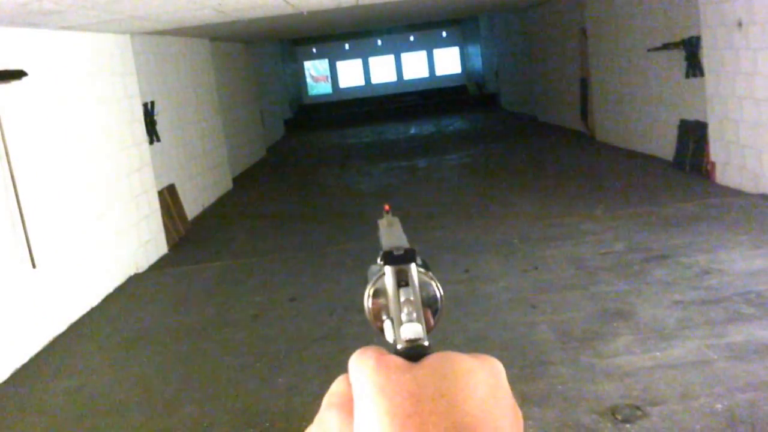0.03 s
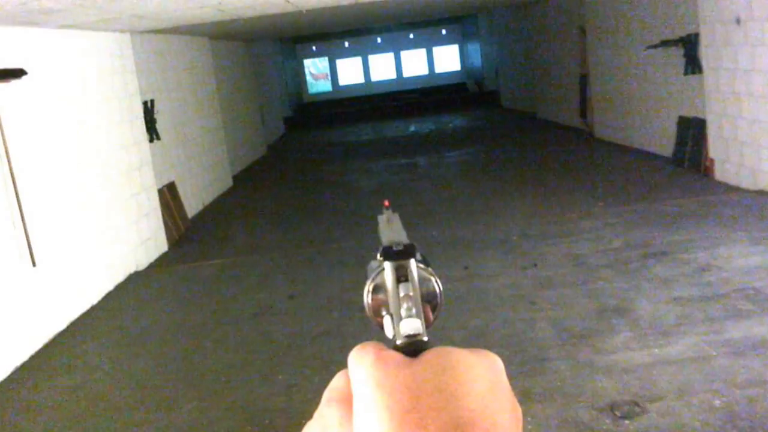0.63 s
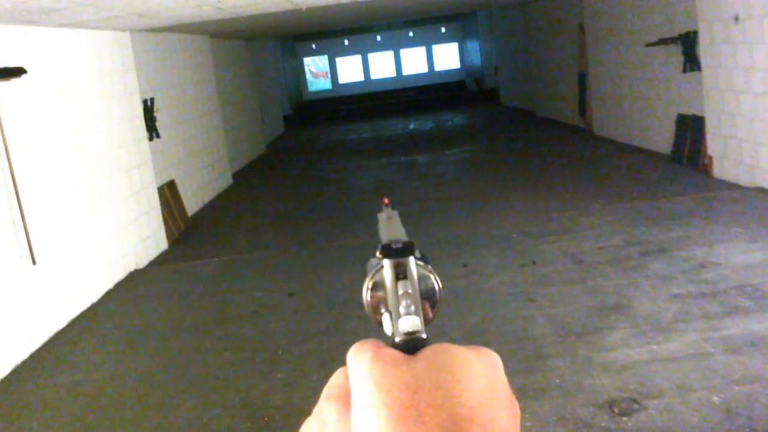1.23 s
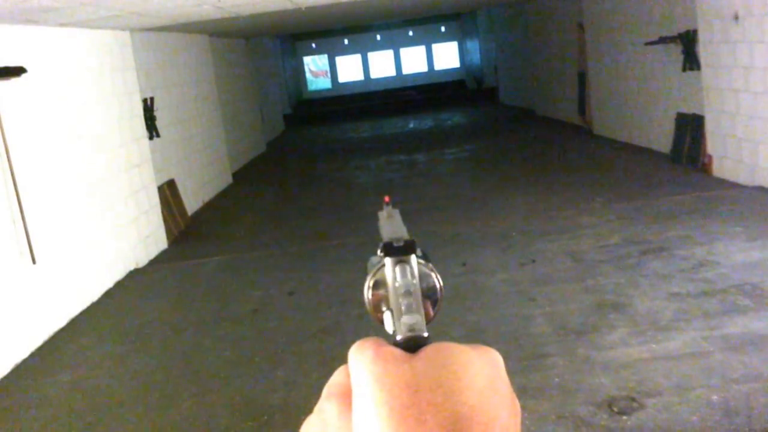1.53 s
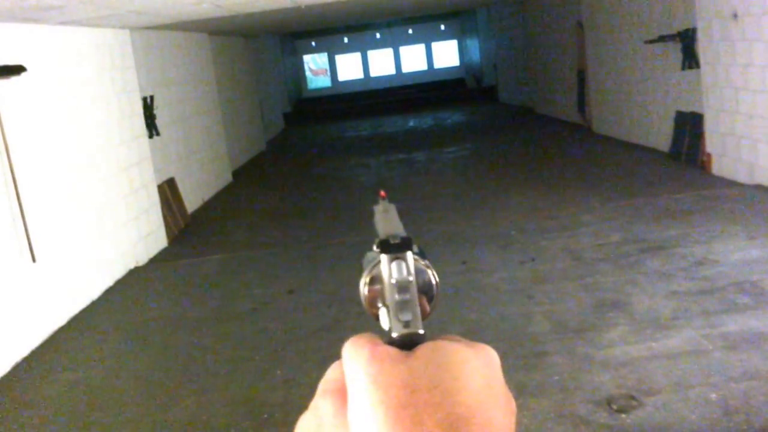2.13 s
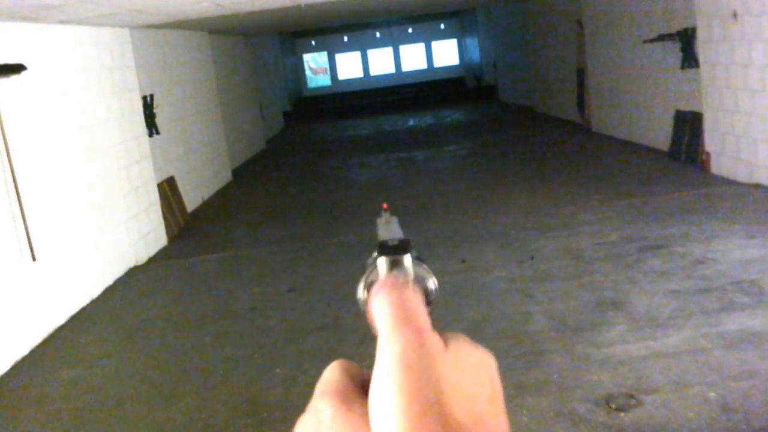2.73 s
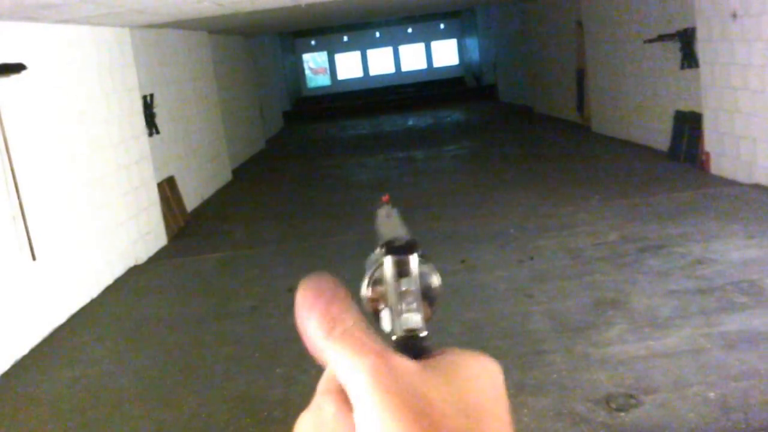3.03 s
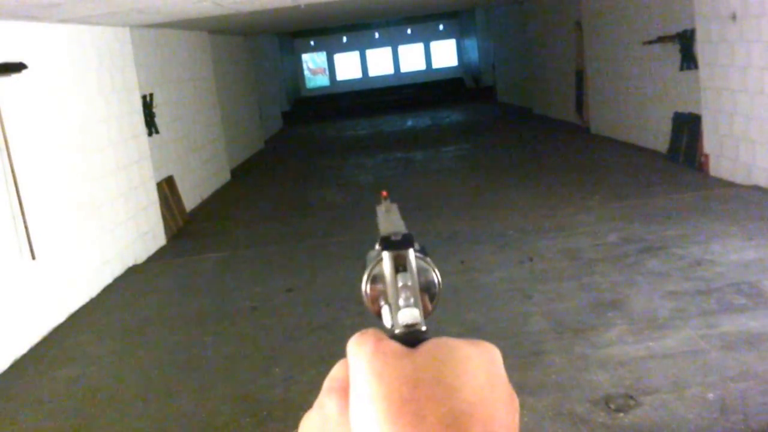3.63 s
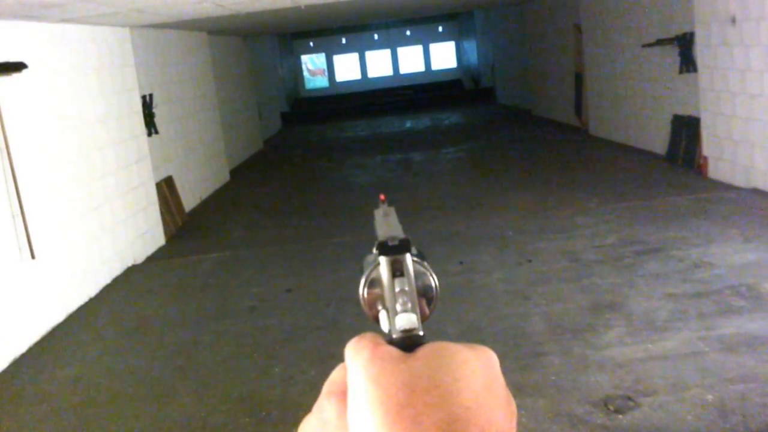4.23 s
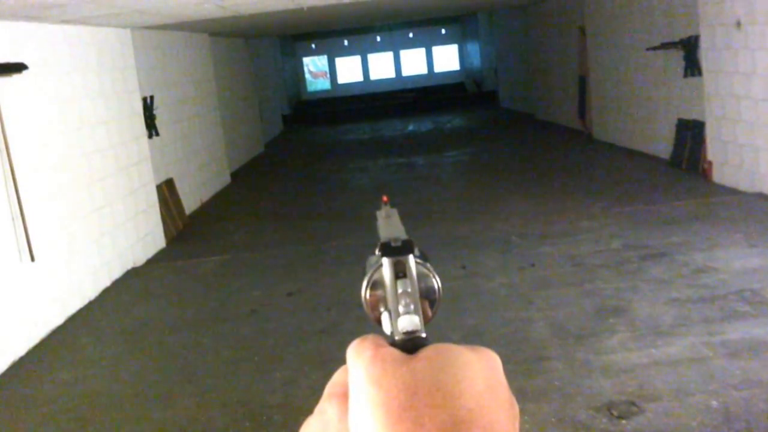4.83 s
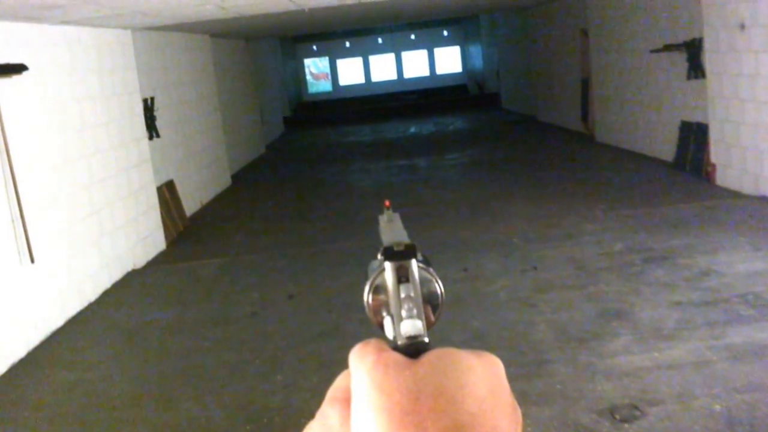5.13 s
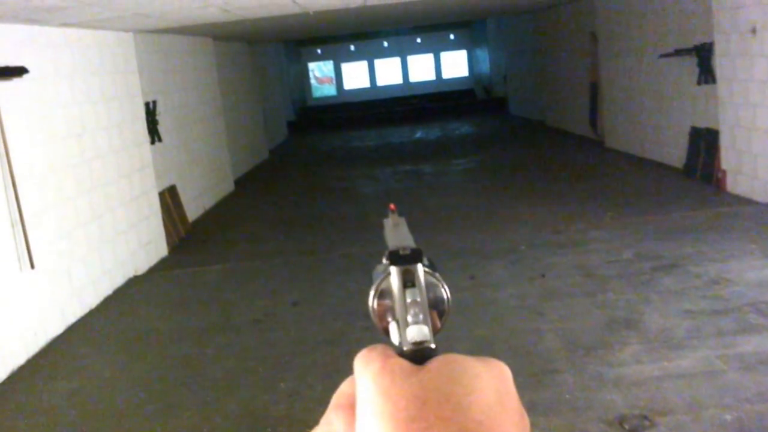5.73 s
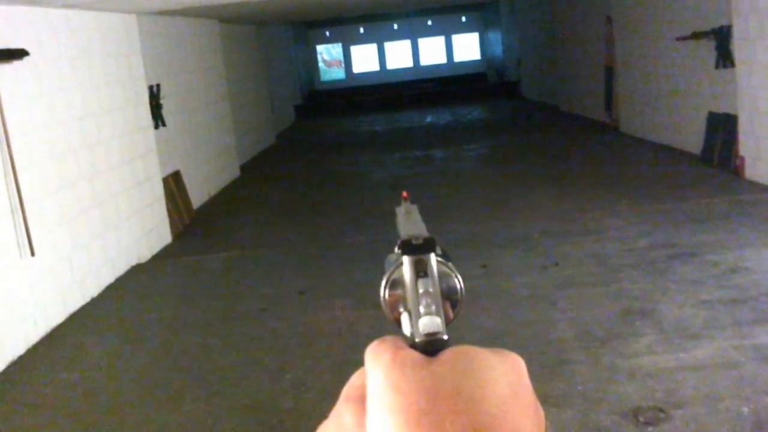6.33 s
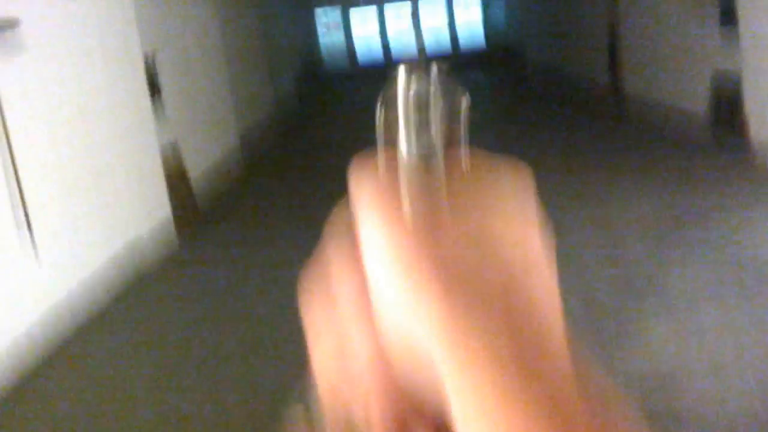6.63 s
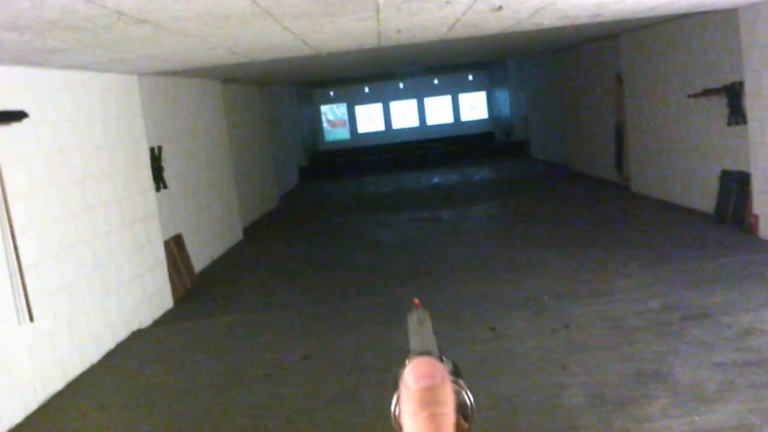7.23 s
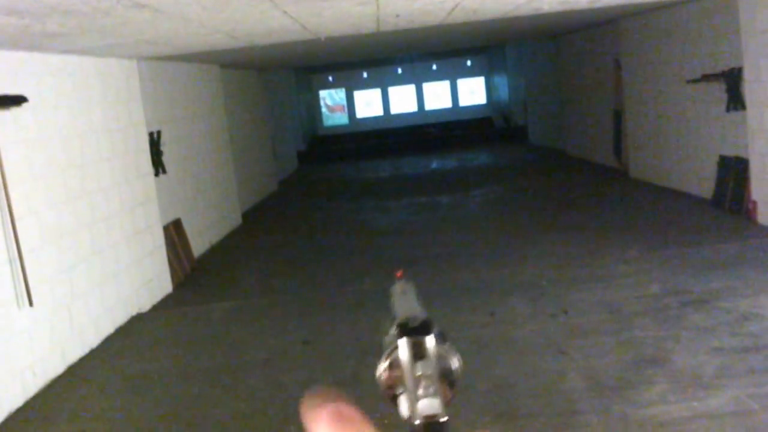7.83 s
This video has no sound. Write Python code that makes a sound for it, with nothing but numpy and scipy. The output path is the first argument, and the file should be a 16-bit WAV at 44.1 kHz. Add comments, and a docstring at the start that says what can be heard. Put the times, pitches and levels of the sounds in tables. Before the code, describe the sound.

In an indoor shooting range, faint hiss and low ventilation run steadily. A revolver's hammer falls on an empty chamber with a small steel click, and a few very faint ticks follow as it is cocked again. After a pause it fires once, right in front of the microphone, overloading it. The blast slaps off concrete walls, bounces back from the far end and rings out over a soft rumble.

```python
"""A long concrete shooting range, heard through a small camera: ventilation, hiss, low flutter, handling.
At 1.5 s a revolver's hammer drops on an empty chamber, ringing the steel frame; the lock ticks as it is
cocked again. At 6.3 s it fires just in front of the camera. The blast overloads the microphone and slaps
off the near walls, then comes back from the bullet trap as two bangs. The hall rings out over the soft
rumble of the recoil."""
import sys
import numpy as np
from scipy import signal
from scipy.fft import rfft, irfft
from scipy.io import wavfile

SR = 44100
rng = np.random.default_rng(int(sys.argv[2]) if len(sys.argv) > 2 else 0)


def store_pcm(level_fs):
    """Save levels as 16-bit WAV."""
    pcm = np.round(np.clip(level_fs, -1, 1) * 32767).astype(np.int16)
    wavfile.write(sys.argv[1], SR, np.atleast_2d(pcm).T)


N = 352800
SHOT_S = 6.3418
AGE = np.arange(2 * SR) / SR  # seconds since a hit

# Tone colour of the blast and its slaps: a deep notch near 1.4 kHz, peaks near 1.95, 2.9 and 4.4 kHz. Each row:
# frequency in Hz, relative level in dB.
SHOT_COLOUR = [(35, -21.5), (80, -15), (130, -5.5), (210, -3.5), (380, 2), (650, 3.5), (1150, -2),
               (1400, -21), (1950, 2), (2450, -3.5), (2900, 0), (3500, -13.5), (4400, -0.5), (5400, -19)]


def gunshot(blast_db=10, echo_db=8.5, loss_db=2.23, walls_m=(3.77, 2.78), wash_db=4, hall_db=-9):
    """The muzzle blast bounces from side wall to side wall, fills the hall and wakes its standing waves."""
    # Standing waves between walls, floor and ceiling.
    # Each row: frequency in Hz, level in dB, seconds to fall 60 dB.
    standing_waves = [(82.5, -41.5, 2.2), (129, -27, 1.15), (150, -36, 0.53), (184, -30, .9)]
    out = np.zeros(N)
    add(out, SHOT_S, undb(blast_db) * slap(length_s=.0006))
    add(out, SHOT_S + .0027, undb(13.5) * slap(length_s=.001))  # reflection off the shooter
    echo_s = SHOT_S
    for k in range(4):
        echo_s += 2 * walls_m[k % 2] / 343  # to a wall and back at the speed of sound
        add(out, echo_s, undb(echo_db - k * loss_db) * slap(length_s=.0006))
    add(out, SHOT_S, undb(wash_db) * noise(SHOT_COLOUR, len(AGE)) * fade(.23))
    add(out, SHOT_S, undb(hall_db) * hall_tail() * swell(.088))
    for hz, db, t60 in standing_waves:
        add(out, SHOT_S, ring(hz, db, t60))
    return out


def slap(length_s, scatter_db=-8, scatter_t60=.029):
    """An N-shaped pressure wave, trailed by the scatter off rough concrete."""
    n_wave = (1 - 2 * AGE / length_s) * (AGE < length_s)
    scatter = undb(scatter_db) * noise(SHOT_COLOUR, len(AGE)) * fade(scatter_t60)
    return band(n_wave, 260, 6000, order=1) + scatter


def hall_tail():
    """Dense echoes of the hall; each octave dies at its own rate."""
    # Tone colour of the hall. Each row: frequency in Hz, relative level in dB.
    hall_colour = [(35, -15.5), (130, -9), (230, -11), (420, -4.5), (650, 0), (1160, -1), (1380, -14.5),
                   (1750, -3), (2050, -3.5), (2650, -10.5), (2950, -2.5), (3600, -12.5), (4300, -4.5),
                   (5400, -18)]
    # Reverb time. Each row: frequency in Hz, seconds to fall 60 dB.
    hall_t60 = [(60, 2.1), (200, 1.34), (500, 1.54), (1100, 1.357), (3000, 1.43), (5000, 0.97)]
    spectrum = rfft(noise(hall_colour, len(AGE)))
    octaves_hz = 45 * 2. ** np.arange(8)
    log_hz = np.log(np.linspace(1, SR / 2, len(spectrum)))
    tail = np.zeros(len(AGE))
    for hz, solo in zip(octaves_hz, np.eye(len(octaves_hz))):
        crossover = np.interp(log_hz, np.log(octaves_hz), solo)
        tail += irfft(spectrum * crossover) * fade(lookup(hall_t60, hz))
    return tail


def bullet_trap(hall_db=-16):
    """The far end answers with two bangs; its steel plates ring faintly and the hall swells again."""
    # Bangs off the trap. Each row: start in seconds, level in dB, rise in seconds, seconds to fall 60 dB.
    bangs = [(6.487, -9, 0.003, .16), (6.508, -8, 0.002, 0.36)]
    # Tone colour of the bangs. Each row: frequency in Hz, relative level in dB.
    trap_colour = [(100, -23), (400, -3.5), (800, -5), (1150, 4.5), (1400, -13.5), (1750, -4), (2300, -5.5),
                   (2650, -10), (2950, 3.5), (3400, -10.5), (4500, -17.5), (5400, -22.5)]
    # Ring of the plates. Each row: frequency in Hz, level in dB, seconds to fall 60 dB.
    plate_modes = [(1040, -41, 2.1), (1110, -41.5, 2.5), (2970, -37, 1.5)]
    first_s, last_s = bangs[0][0], bangs[-1][0]
    out = np.zeros(N)
    for start_s, db, rise_s, t60 in bangs:
        add(out, start_s, undb(db) * noise(trap_colour, len(AGE)) * swell(rise_s) * fade(t60))
    add(out, last_s, undb(hall_db) * hall_tail() * swell(.03))
    for hz, db, t60 in plate_modes:
        add(out, first_s, ring(hz, db, t60))
    return out


def lockwork(hammer_s=1.516, hammer_db=-32, bounce_loss_db=7, room_db=-11):
    """The hammer falls on an empty chamber and bounces, the lock ticks; the near walls answer faintly."""
    # Ticks as the trigger is let go and the thumb cocks the hammer.
    # Each row: start in seconds, peak level in dB, band centre in Hz.
    lock_ticks = [(1.5765, -54, 4500), (2.046, -55, 3000), (2.669, -54, 2900), (2.733, -51, 1750),
                  (3.072, -57, 3500)]
    clicks = np.zeros(N)
    hit_s = hammer_s
    for k in range(3):
        add(clicks, hit_s, undb(hammer_db - k * bounce_loss_db) * steel_click())
        hit_s += .0071 * .45 ** k  # each bounce is shorter than the last
    for start_s, db, hz in lock_ticks:
        tick = band(steel_click(), hz / 1.35, hz * 1.35, order=1)
        add(clicks, start_s, undb(db) * tick / np.abs(tick).max())
    room = rng.standard_normal(len(AGE)) * fade(.22) * swell(.0039)
    reverb = signal.fftconvolve(clicks, room / np.linalg.norm(room))[:N]
    return clicks + undb(room_db) * reverb


def steel_click(grit_db=-6, grit_t60=.025):
    """One gritty hit of steel on steel rings the revolver's frame; peak 1."""
    # The frame, damped by the hand. Each row: frequency in Hz, relative level in dB, seconds to fall 60 dB.
    frame_modes = [(1060, -13, .012), (1970, -9.5, 0.023), (2330, -11, .024), (2920, -2.5, 0.025),
                   (3180, -3, .010), (3500, -7, .014), (3950, -9, .016), (4500, -4.5, .013),
                   (4760, -4, 0.011)]
    # Tone colour of scraping steel. Each row: frequency in Hz, relative level in dB.
    grit_colour = [(600, -18), (2000, -4), (3000, 4), (3900, 0), (4700, -7), (5400, -4)]
    frame = sum((-1) ** k * ring(hz, db, t60) for k, (hz, db, t60) in enumerate(frame_modes))
    click = frame + undb(grit_db) * noise(grit_colour, len(AGE)) * fade(grit_t60)
    return click / np.abs(click).max()


def handling(recoil_db=-45, recoil_t60=4.5, hands_db=-58.5, grip_rise_s=.06):
    """Rumble through the camera body: the grip tightens, the recoil dies down, the hands keep moving."""
    since_shot = np.arange(N) / SR - SHOT_S
    grip = np.exp(np.minimum(since_shot, 0) / grip_rise_s)
    shake = undb(recoil_db - 60 * np.maximum(since_shot, 0) / recoil_t60)
    rumble = unit(band(rng.standard_normal(N), 25, 85, order=4))
    return grip * np.hypot(shake, undb(hands_db)) * rumble


def camera_flutter(rate_hz=19.8194, tick_db=-58, swing_db=-53, uneven_db=1.9, jitter_s=.0003):
    """The camera pulses faintly; each pulse is a dull double tick and one slow swing of pressure."""
    period = int(SR / rate_hz)
    tick = ring(hz=305, db=tick_db, t60=.035)[:period]
    swing_phase = np.clip((AGE[:period] - .005) / .027, 0, 1)
    swing = -undb(swing_db) * np.sin(2 * np.pi * swing_phase)
    gap_s = .0098  # between the two ticks
    out = np.zeros(N)
    for start_s in np.arange(.0132, N / SR - 2 * gap_s, 1 / rate_hz):
        first_slip, second_slip, accent = rng.standard_normal(3)
        add(out, start_s + jitter_s * first_slip, undb(uneven_db * accent) * (tick + swing))
        add(out, start_s + gap_s + 2 * jitter_s * second_slip, undb(-5) * tick)
    return out


def room_tone(hiss_db=-65.5, vent_db=-63.5):
    """A steady bed of microphone hiss over the low rush of the ventilation."""
    # Tone colour of the hiss. Each row: frequency in Hz, relative level in dB.
    hiss_colour = [(210, -29.5), (350, -2), (602, -2), (1000, -6), (1120, -6), (2960, -10), (5200, -12),
                   (6760, -39.5), (11400, -120)]
    # Tone colour of the ventilation. Each row: frequency in Hz, relative level in dB.
    vent_colour = [(15, -2), (30, -0.5), (50, -1), (80, 1.5), (120, -0.5), (200, -5), (320, -6.5),
                   (420, -15.5), (1000, -37)]
    return undb(hiss_db) * noise(hiss_colour, N) + undb(vent_db) * noise(vent_colour, N)


def undb(db):
    """Decibels to gain."""
    return 10 ** (np.asarray(db) / 20)


def unit(x):
    """Scale to rms 1."""
    return x / np.sqrt(np.mean(x ** 2))


def lookup(points, hz):
    """Read (Hz, value) points on a log-frequency axis."""
    points_hz, values = np.transpose(points)
    return np.interp(np.log(hz + 1), np.log(points_hz), values)


def noise(colour, size):
    """Coloured noise of rms 1, rolled off steeply above 6 kHz."""
    hz = np.arange(size // 2 + 1) * SR / size
    rolloff = 1 / (1 + (hz / 6000) ** 24)
    white = rfft(rng.standard_normal(size))
    return unit(irfft(white * undb(lookup(colour, hz)) * rolloff, size))


def band(x, low_hz, high_hz, order):
    """Causal band-pass."""
    return signal.sosfilt(signal.butter(order, [low_hz, high_hz], "band", fs=SR, output="sos"), x)


def ring(hz, db, t60):
    """One struck resonance: a dying sine."""
    return undb(db) * np.sin(2 * np.pi * hz * AGE) * fade(t60)


def fade(t60):
    """Exponential decay, 60 dB in t60 seconds."""
    return np.exp(-np.log(1000) * AGE / t60)


def swell(rise_s):
    """Attack from silence towards 1."""
    return 1 - np.exp(-AGE / rise_s)


def add(out, start_s, x):
    """Mix x into out from start_s on."""
    i = int(start_s * SR)
    out[i:i + len(x)] += x[:N - i]


def scene():
    """The mono mix at the microphone."""
    return (gunshot() + bullet_trap() + lockwork() + room_tone() + handling())[None]


def record(dry, overload=1.092, low_cut_hz=70, high_cut_hz=5520):
    """The microphone saturates; the camera thins the bass, adds flutter, cuts the treble and clips."""
    saturated = dry / (1 + np.abs(dry / overload) ** 4) ** (1 / 4)
    thin = signal.sosfilt(signal.butter(1, low_cut_hz, "high", fs=SR, output="sos"), saturated)
    high_cut = signal.firwin(221, high_cut_hz, window=("kaiser", 8), fs=SR)
    narrow = signal.fftconvolve(thin + camera_flutter(), high_cut[None], mode="same")
    fizz_cut = signal.ellip(8, .1, 70, 16000, fs=SR, output="sos")  # takes the very top off the clipping
    return signal.sosfilt(fizz_cut, np.clip(narrow, -1, 1))


dry = scene()
out = record(dry)
store_pcm(out)
```